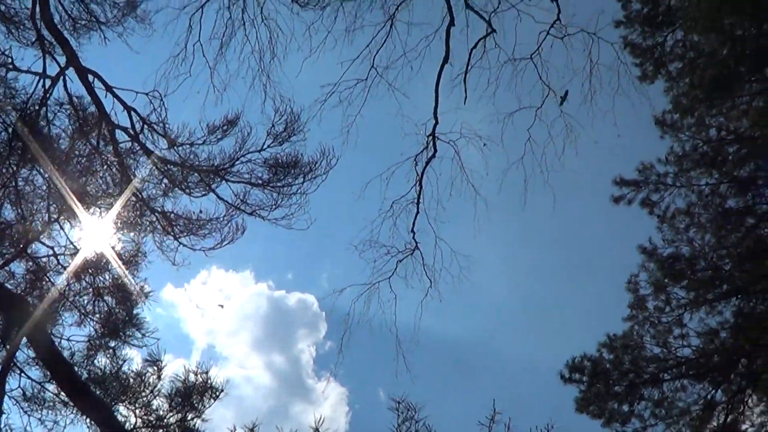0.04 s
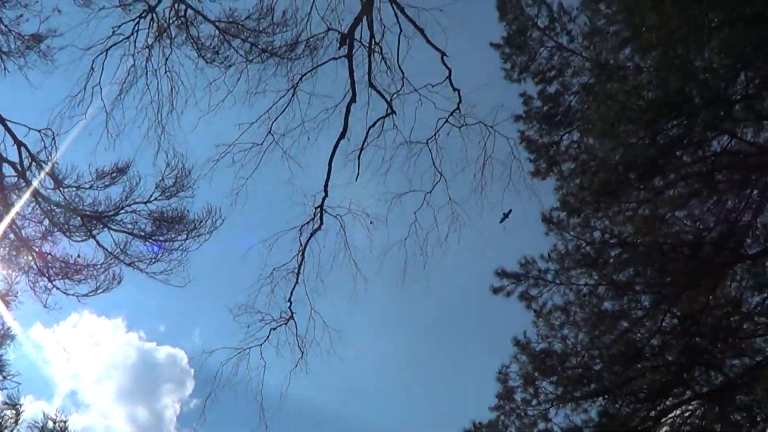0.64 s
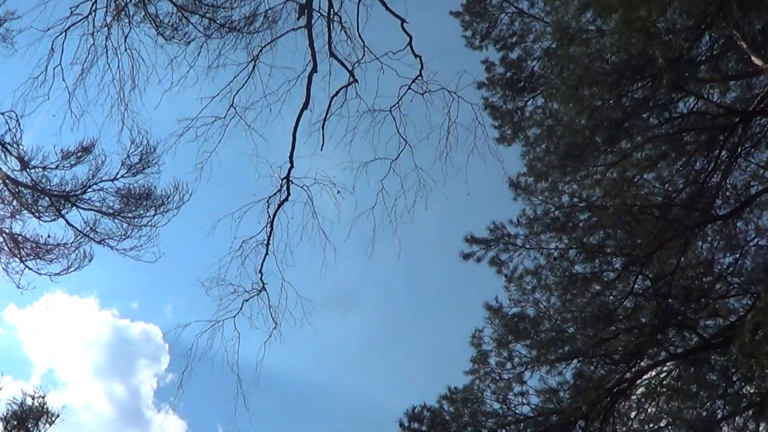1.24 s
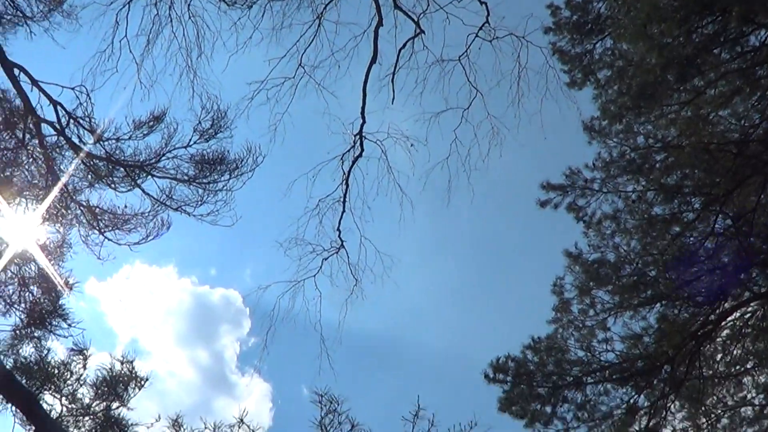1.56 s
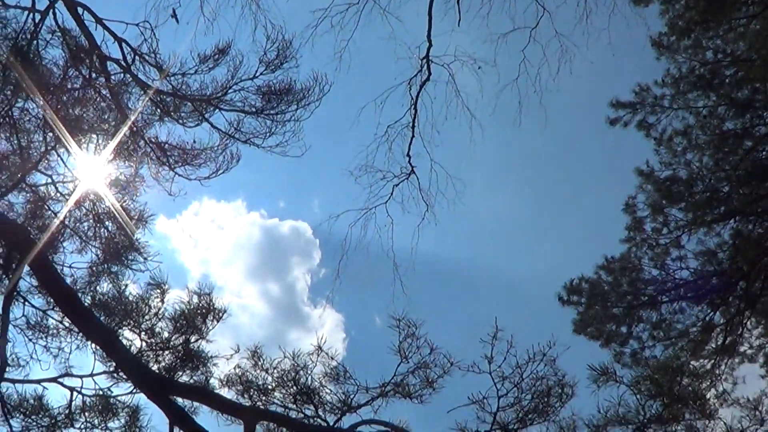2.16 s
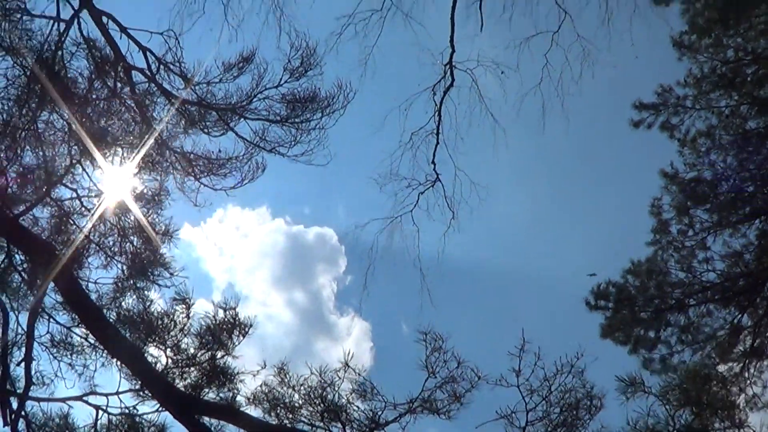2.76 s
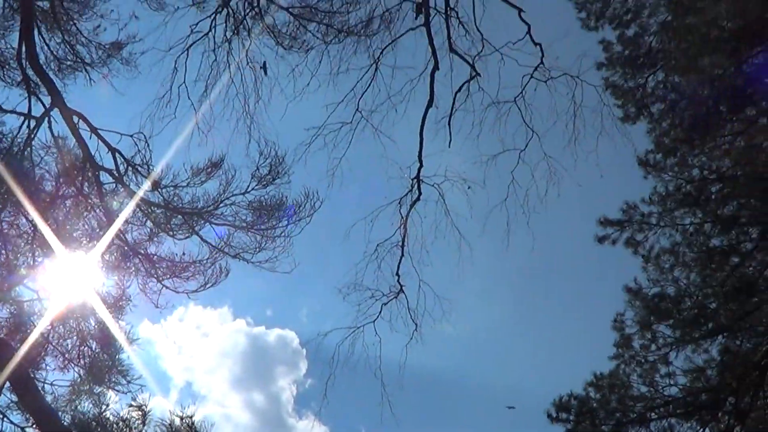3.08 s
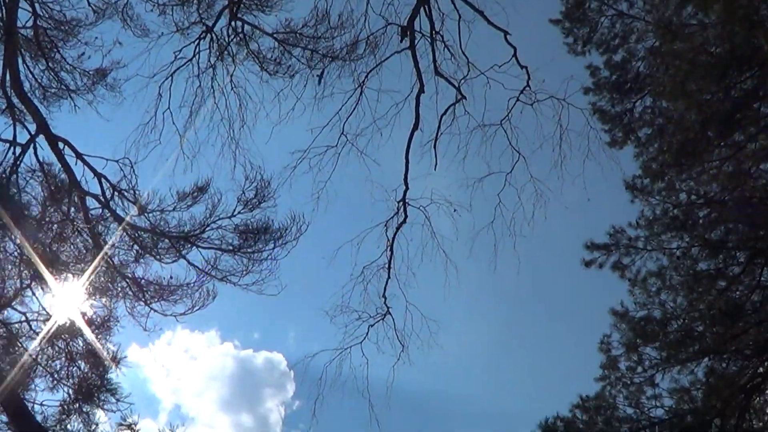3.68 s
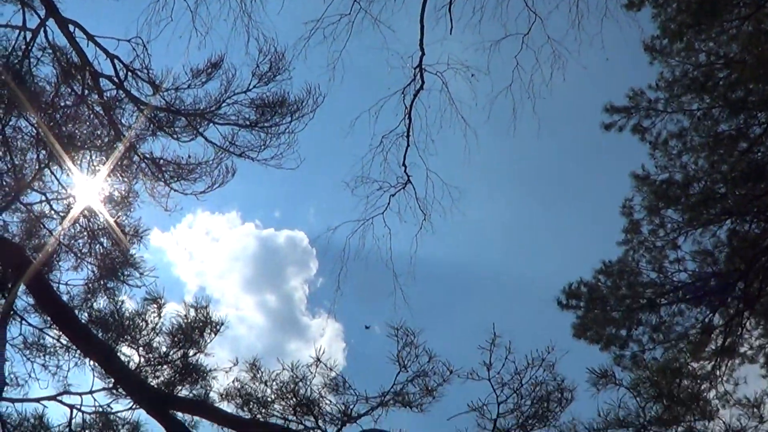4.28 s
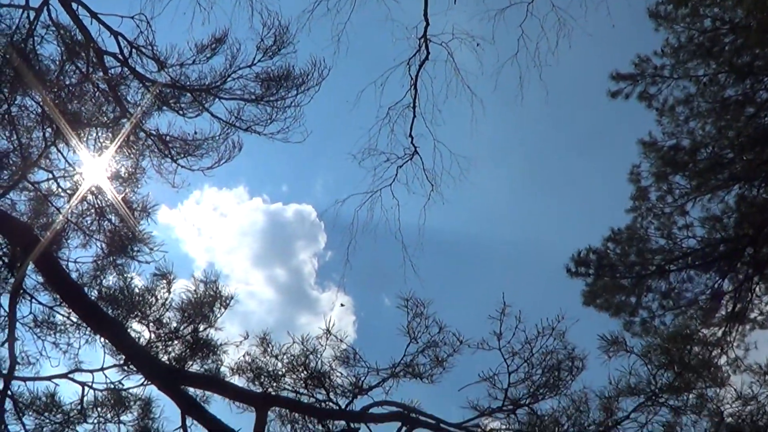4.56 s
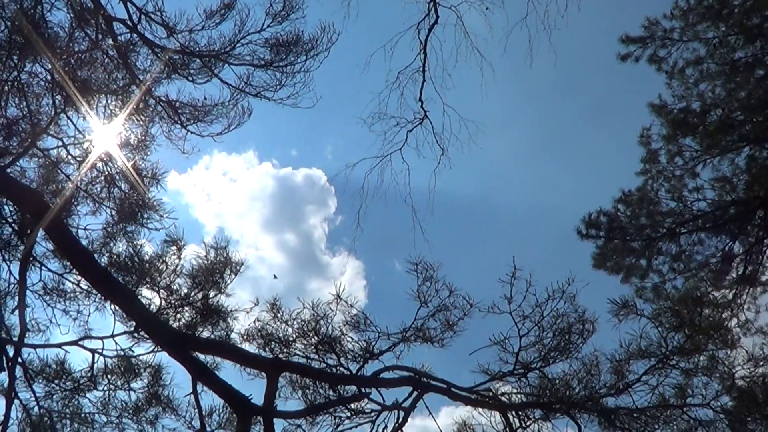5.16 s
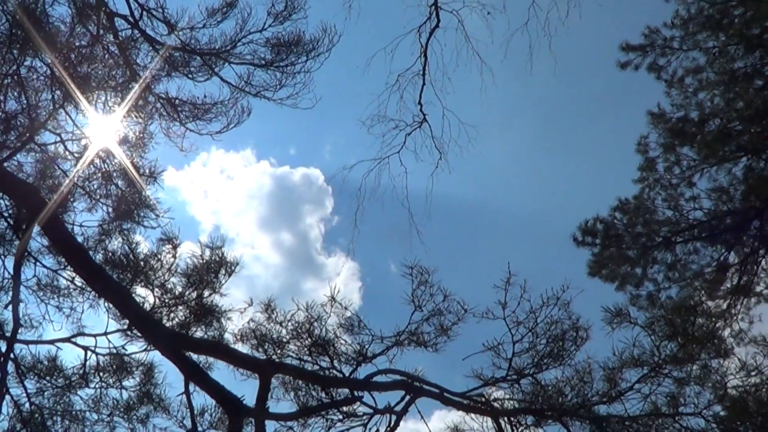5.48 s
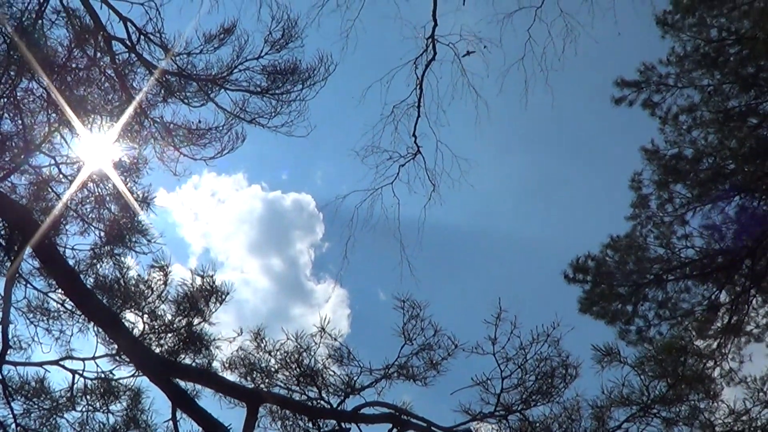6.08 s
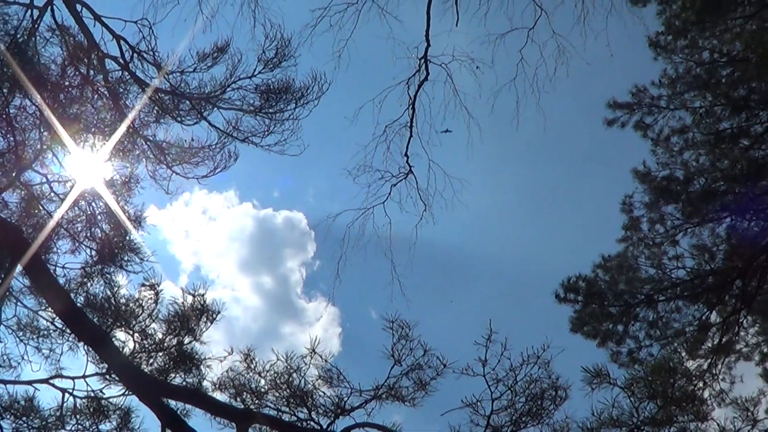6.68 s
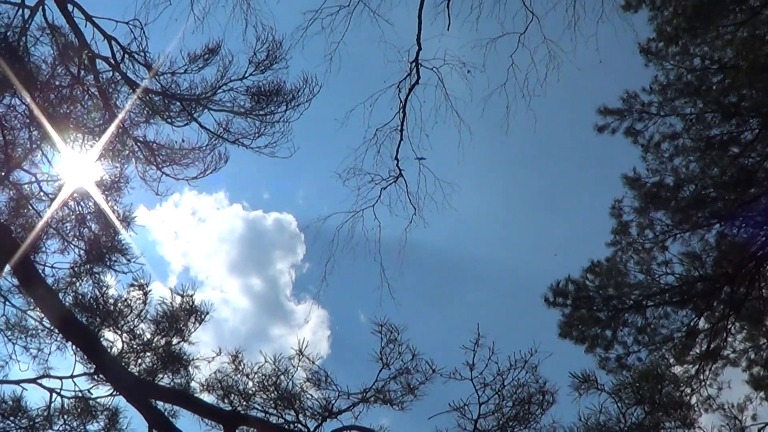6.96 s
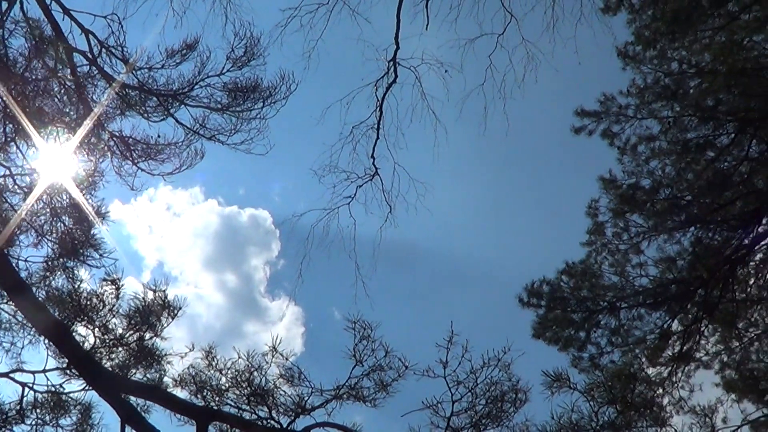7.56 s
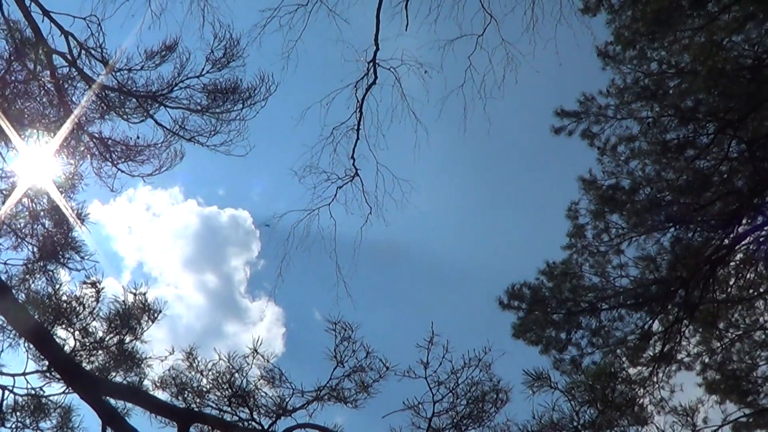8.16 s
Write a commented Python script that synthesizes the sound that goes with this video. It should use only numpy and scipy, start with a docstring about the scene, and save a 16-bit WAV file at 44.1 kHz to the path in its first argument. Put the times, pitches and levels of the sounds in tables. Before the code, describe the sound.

Ravens fly over a forest, croaking with a dry rasp: three near calls first, then a short break and a run of seven weaker ones that echo among the trees. Low gusts bump against the microphone, mostly in the first half. Thin, high chirps of small birds are scattered throughout, while twigs tick and something briefly rustles close by over a soft hiss of outdoor air.

```python
"""Wind rumbles on the microphone and at once ravens croak, ten times, flying over a pine forest.
Each croak is a slowing rattle of rasps from the syrinx, filtered by throat, beak and windpipe;
the first three are nearest, and the trees throw back a long, dull echo. Small birds chirp, twigs
tick and something rustles close by, over the hush of the forest and the camera's faint whine."""
import sys
import numpy as np
from scipy import signal
from scipy.fft import rfft, irfft, next_fast_len
from scipy.io import wavfile
from scipy.ndimage import uniform_filter1d, map_coordinates

SR = 44100
rng = np.random.default_rng(int(sys.argv[2]) if len(sys.argv) > 2 else 0)


def master(y):
    """Save y as 16-bit WAV."""
    cut = np.clip(np.atleast_2d(y).T, -1, 1)
    pcm = np.round(cut * 32767)  # scale
    wavfile.write(sys.argv[1], SR, pcm.astype(np.int16))


N = 371763
TIME = np.arange(N) / SR
# likeness of left and right in the hush and the rustle: (frequency [Hz], coherence [0-1])
AIR_COHERENCE = [(50, 1), (300, 0.054), (1000, 0.06), (4000, 0.26), (8000, 0.42), (13000, 0.98)]


def ravens(gain_db=-1.35):
    """Superposition: the croaks add up, the later and more distant ones weaker."""
    # croaks: (time [s], rasps [count], first gap [s], last gap [s], relative level [dB], onset gain [dB],
    # top pitch [Hz], throat resonance [Hz], beak gain [dB], windpipe gain [dB], windpipe tilt [dB/octave])
    croaks = [(.253, 14, 0.0098, .0225, -27, -17, 489, 1162, -10, -3.5, -7),
              (.781, 14, .012, .0195, -28, -10.5, 480.7, 1178, -6, -6, -4.5),
              (1.5255, 14, .011, 0.02, -31, -5.5, 328.8, 1048, -10, -6.5, 1),
              (3.9853, 9, .018, .0245, -31.5, -5, 398.6, 1060, -4, -6.5, -5.5),
              (4.424, 7, 0.022, .029, -35, 0, 365.7, 1054, -9, -14, -9),
              (4.827, 9, .019, 0.031, -35.5, 1, 351.2, 1020, -16, -12.5, -6.5),
              (5.450, 8, .0235, .024, -36, 2.5, 387, 1085, -9, -9.5, -11),
              (5.913, 12, 0.013, 0.029, -37, -1, 369.8, 1116, -11, -12.5, -5),
              (6.447, 9, .0195, .0325, -37.5, -5.5, 355.6, 1094, -15.5, -15, -9.5),
              (6.931, 4, 0.019, 0.029, -39, -0.5, 383, 1090, -17, -17, 1)]
    out = np.zeros(N)
    for start, *voice in croaks:
        add(out, start, croak(*voice))
    return amp(gain_db) * out


def croak(count, first_gap, last_gap, level_db, onset_db, top_hz, throat_hz, beak_db, pipe_db, tilt_db):
    """Source and filter: rasps ring the tract; pitch and formants arch as the beak opens and shuts."""
    # windpipe modes for a throat at 1170 Hz: (frequency [Hz], width [Hz], relative gain [dB])
    windpipe = [(2590, 364, -5), (3517, 350, -4.5), (4010, 284, -5), (4540, 620, -15.5), (5230, 780, -18),
                (6670, 4600, -31)]
    pipe_scale = (throat_hz / 1170) ** .3
    onset_s, bright_s, fade_s = .027, .12, .055
    gaps = np.linspace(first_gap, last_gap, count - 1)
    starts = np.append(0, np.cumsum(gaps))
    t = np.arange(int((starts[-1] + last_gap) * SR)) / SR
    shut = 1 - np.sin(np.pi * (t / t[-1]) ** 1.3)
    fading = np.clip(1 - (t[-1] - t) / fade_s, 0, 1) ** 2
    drive = syrinx(t, starts, np.append(gaps, last_gap), pitch=top_hz * (1 - .15 * shut ** 2))
    throat = (throat_hz * (1 - .039 * (shut - .3)), top_hz, 0)  # as wide as the top pitch
    beak = (1.61 * throat_hz * (1 - .058 * (shut - .2)), 380, beak_db - 10 * shut)
    # the first rasps snap hardest; the last are dull
    bright_db = pipe_db + 4 * np.exp(-t / bright_s) - 4 * fading
    pipe = [(hz * pipe_scale, width, db + bright_db + tilt_db * np.log2(hz / 3000))
            for hz, width, db in windpipe]
    chest = amp(-23) * resonate(drive, hz=400, width=560)
    voice = vocal_tract(drive, [throat, beak, *pipe]) + chest
    return unit(voice) * amp(level_db + onset_db * np.exp(-t / onset_s) - 12 * fading)


def syrinx(t, starts, gaps, pitch, opening_s=.11, jitter=.05, shimmer_db=2, sag_db=5.5, puff_s=.0014):
    """Pulse excitation: the syrinx opens once a rasp and claps a few times, ever faster."""
    claps, gate = np.zeros((2, len(t)))
    for start, gap in zip(starts, gaps):
        length = gap * np.interp(start, [0, opening_s], [.14, .92])  # rasps lengthen and nearly merge
        timing, size = rng.standard_normal((2, 20))
        hz = np.interp(start, t, pitch)
        progress = np.minimum(np.arange(len(timing)) / (hz * gap), 1)
        periods = (1 + jitter * timing - .1 * (progress - .5)) / hz
        offsets = np.cumsum(periods) - periods[0]
        for offset, db in zip(offsets[offsets < length], size * shimmer_db):
            # the claps are strongest early in each rasp
            add(claps, start + offset, amp([db - sag_db * (2 * offset / gap - .55) ** 2]))
        gate[(t >= start) & (t < start + length)] = 1
    # each clap lets a puff of turbulent air through
    airflow = signal.lfilter([1], [1, -np.exp(-1 / (puff_s * SR))], claps) + .066 * gate
    puffs = airflow * rng.standard_normal(len(t))
    return unit(claps) + .4 * unit(puffs)


def vocal_tract(drive, formants, flutter_db=1.5, wobble=.025, flutter_s=.011):
    """Parallel resonators of alternating sign quiver: (frequency [Hz], width [Hz], gain [dB])."""
    voice = np.zeros(len(drive))
    for k, (hz, width, db) in enumerate(formants):
        ring = resonate(drive, hz * (1 + wobble * wander(len(drive), flutter_s)), width)
        voice += (-1) ** k * amp(db + flutter_db * wander(len(drive), flutter_s)) * ring
    low_cut_hz = .59 * np.mean(formants[0][0])
    return signal.sosfilt(signal.butter(4, low_cut_hz, "highpass", fs=SR, output="sos"), voice)


def small_birds(waver=.0062):
    """Frequency modulation: each thin whistle is one tilted arch of pitch."""
    # chirps: (time [s], length [s], middle pitch [Hz], rise [share of that pitch], level [dB])
    chirps = [(.68, .082, 7430, 0.052, -53), (1.127, 0.071, 4260, .055, -48),
              (1.324, 0.053, 4230, .03, -50), (3.313, 0.08, 7880, .03, -55),
              (3.502, .071, 4340, .03, -53.5), (3.8, 0.073, 4300, 0.0015, -50),
              (4.28, .08, 4720, -.06, -61), (4.936, .21, 5050, -.16, -58.5), (5.092, 0.098, 7100, .02, -63),
              (5.29, 0.13, 4350, 0.006, -55.5), (5.52, 0.16, 4510, .045, -56),
              (7.405, .085, 7850, .08, -60), (7.611, 0.061, 4380, .06, -52), (7.83, 0.1, 4220, 0, -59)]
    out = np.zeros(N)
    for start, length, middle_hz, rise, db in chirps:
        position = np.linspace(-.5, .5, int(length * SR))
        arch = .064 * (middle_hz / 7630) ** 3.43  # lower whistles are flatter
        contour = 1 + rise * position - arch * (2 * position) ** 2
        hz = middle_hz * (contour + waver * wander(len(position), .0022))
        add(out, start, amp(db) * np.cos(np.pi * position) * np.sin(2 * np.pi * np.cumsum(hz) / SR))
    return out


def forest_echo(calls, near_db=-10, far_db=-16, near_s=.011, build_s=.0087, sway_s=.000836):
    """Scattering and reverberation: near branches answer at once, distant trunks with a long tail."""
    # reverberation of the forest: (frequency [Hz], time to fall 60 dB [s])
    decay_times = [(300, 0.23), (1100, 1.36), (1700, 0.88), (2600, 0.79), (4500, 0.59), (9000, 0.093)]
    t = np.arange(2 * SR) / SR
    taps = rng.standard_normal((2, len(t))) * (rng.random((2, len(t))) < 2500 / SR)
    taps = taps + .79 * taps[::-1]  # each reflection reaches both sides
    near = taps[:, ::-1] * np.exp(-t / near_s) * (t > .003)
    hz, frame_s, spectra = signal.stft(taps, SR, nperseg=256)
    decay = amp(-60 * frame_s / at_hz(decay_times, hz)[:, None])
    far = signal.istft(spectra * decay, SR, nperseg=256)[1][:, :len(t)]
    far *= 1 - np.exp(-t / build_s)
    # the birds are in flight: a wandering delay gives the tail slight Doppler shifts
    shifted = map_coordinates(calls, [np.arange(N) + sway_s * SR * wander(N, .03)], order=3)
    early = signal.fftconvolve(calls[None], amp(near_db) * near / np.linalg.norm(near[0]), axes=1)
    late = signal.fftconvolve(shifted[None], amp(far_db) * far / np.linalg.norm(far[0]), axes=1)
    return (early + late)[:, :N]


def twigs(decay_s=.0042):
    """Damped resonance: a dying puff of noise excites a dry snap and a woody knock."""
    # ticks: (time [s], peak level [dB], snap centre [Hz], knock against snap [dB])
    ticks = [(0.119, -36, 4550, -2), (1.688, -35, 8000, -20), (2.959, -34.5, 880, -14),
             (3.036, -32.5, 7000, -5.5), (3.051, -32, 1160, -14), (3.288, -31.5, 1340, -14),
             (3.767, -32.5, 850, -20), (7.002, -30.5, 7960, 5), (7.297, -39, 4700, -26),
             (7.647, -33.5, 2000, 1)]
    out, t = np.zeros(N), np.arange(SR // 20) / SR
    for start, db, hz, knock_db in ticks:
        puff = rng.standard_normal(len(t)) * np.exp(-t / decay_s)
        snap = unit(resonate(puff, hz, width=1.7 * hz))
        knock = amp(knock_db) * unit(resonate(puff, hz=2300, width=1300))
        tick = snap + knock
        add(out, start, amp(db) * tick / abs(tick).max())
    return out


def microphone_ports(x):
    """Phase and level cues: overhead sound leads at the left port; the balance shifts as birds pass."""
    # lead of the left port: (frequency [Hz], phase [rad])
    left_lead = [(100, .05), (400, 0.7), (850, 0.64), (1500, 0.69), (3700, 0.54), (6500, 0.89), (9500, .02)]
    # stereo balance: (time [s], right minus left [dB])
    balance = [(.6, 0.5), (1.6, 1.5), (4.2, 0.5), (6, -0.7)]
    size = next_fast_len(N)
    phase = at_hz(left_lead, np.fft.rfftfreq(size, 1 / SR))
    right = irfft(rfft(x[1], size) * np.exp(-1j * phase), size)[:N]
    right_db = at_time(balance)
    return np.array([x[0] * amp(-right_db / 2), right * amp(right_db / 2)])


def wind(lumps_db=3, knee_db=-30):
    """Turbulence at the microphone rumbles; strong gusts and sudden buffets reach higher in pitch."""
    # gusts: (start [s], length [s], relative level [dB], swell from start to end [dB])
    gusts = [(0, .83, -35, 2), (.93, 0.083, -34, 8), (1.12, 0.13, -32, 11), (1.431, 0.26, -37, 5),
             (1.812, 0.06, -36, 11), (2.046, 0.19, -37, 6.5), (2.398, .05, -47, -1),
             (3.073, 0.98, -33.5, 5), (4.305, 0.034, -42.5, 3), (4.555, 0.26, -49, -4.5),
             (5.117, 0.064, -49.5, 4), (6.298, 0.018, -51, 2), (6.695, 0.57, -57, -3),
             (7.321, 0.2, -41.5, 11), (7.813, 0.57, -53, -3.5)]
    # sharp buffets: (peak time [s], level [dB], half-width at 1/e [s])
    buffets = [(0.119, -27.5, 0.0057), (0.264, -27, 0.015), (0.491, -25.5, 0.016), (0.562, -26, 0.02),
               (1.227, -31, 0.012), (1.297, -25.5, 0.0048), (1.897, -15.5, 0.015), (2.18, -22, 0.023),
               (3.437, -30, 0.011), (3.503, -25.5, 0.0094), (3.676, -22.5, 0.013), (3.773, -23, 0.015),
               (3.881, -24.5, 0.018), (3.937, -18.5, 0.011), (3.972, -22.5, 0.021), (4.649, -34.5, 0.006),
               (7.528, -38, 0.0088), (8.277, -38.5, 0.0073)]
    # spectra of the deep and of the brighter eddies: (frequency [Hz], relative level [dB])
    rumble_spectrum = [(12, -32), (25, -1), (55, 6.5), (110, 4.5), (170, -1), (230, -10.5), (320, -15.5),
                       (500, -29), (900, -60), (1600, -100)]
    buffet_spectrum = [(25, -61), (70, -3), (140, 3.5), (250, -3.5), (400, -13.5), (700, -25.5),
                       (1500, -43), (3000, -64.5)]
    level_db = 20 * np.log10(sum(gust(*row) for row in gusts)) + lumps_db * wander(N, .016)
    rumble = amp(level_db - .5) * eddies(rumble_spectrum, steady_s=.36)
    edge = amp(level_db - 12 + np.minimum(.5 * (level_db - knee_db), 0))
    sudden = sum(amp(db) * np.exp(-((TIME - peak_s) / half_s) ** 2) for peak_s, db, half_s in buffets)
    return rumble + np.hypot(edge, sudden) * eddies(buffet_spectrum, steady_s=.015)


def gust(start, length, db, swell_db, attack_s=.02, release_s=.038):
    """Exponential envelope: a gust arrives quickly, swells or ebbs steadily and drops away."""
    t = TIME - start
    outside = np.maximum(-t, 0) / attack_s + np.maximum(t - length, 0) / release_s
    return amp(db + swell_db * (np.clip(t / length, 0, 1) - .5)) * np.exp(-np.minimum(outside, 20))


def eddies(spectrum, steady_s):
    """Turbulent pressure: low noise whose power is even over spans longer than steady_s."""
    pressure = noise(spectrum, coherence=[(30, .7), (70, .92), (130, .49), (260, .016)])
    return pressure / np.sqrt(smooth((pressure ** 2).mean(0), steady_s) + .011)


def rustle(grain_db=2, grain_s=.0047):
    """Random amplitude modulation turns noise into soft, grainy scuffing close by."""
    # envelope of the scuffing: (time [s], level [dB])
    levels = [(2.6, -81), (2.8, -56.5), (2.95, -53), (3.08, -58), (3.3, -65), (3.9, -59), (4.1, -80)]
    # its spectrum: (frequency [Hz], relative level [dB])
    spectrum = [(100, -7), (300, 3), (900, -1), (2500, -1), (4500, -2), (7500, -2), (11000, -10),
                (16000, -21)]
    grains = np.minimum(wander(N, grain_s), 1.2)
    return amp(at_time(levels)) * unit(amp(grain_db * grains)) * noise(spectrum, AIR_COHERENCE)


def hush():
    """Broadband noise floor: forest air and microphone hiss drift slowly in level."""
    # envelope of the hush: (time [s], level [dB])
    levels = [(0, -47.5), (2.6, -50.5), (4.4, -49.5), (8.4, -53)]
    # its spectrum: (frequency [Hz], relative level [dB])
    spectrum = [(15, -20), (30, 4), (167, -2), (420, -0.5), (720, -2), (1110, -3), (1730, -8.5),
                (2920, -8.5), (4200, -11.5), (7000, -16), (11300, -18.5), (16000, -19.5)]
    return amp(at_time(levels)) * noise(spectrum, AIR_COHERENCE)


def camera_whine(db=-58, line_hz=15625, field_hz=50, blank_share=.1, slip_turns=.12):
    """Periodic gating: the line-scan tone drops out briefly and restarts once a field."""
    field = TIME * field_hz % 1
    gate = smooth(1. * (field > blank_share), .002)
    return amp(db) * np.sin(2 * np.pi * (line_hz * TIME + slip_turns * field)) * gate


def resonate(x, hz, width):
    """Resonance: a steep band-pass whose centre follows hz."""
    carrier = np.exp(2j * np.pi * np.cumsum(hz * np.ones(len(x))) / SR)
    pole = np.exp(-np.pi * width / SR)
    return 2 * (carrier * signal.lfilter([(1 - pole) ** 2], [1, -2 * pole, pole ** 2], x / carrier)).real


def noise(spectrum, coherence):
    """Spectral shaping: stereo noise of rms 1 with a given colour and left-right coherence."""
    size = next_fast_len(N)
    hz = np.fft.rfftfreq(size, 1 / SR)
    mid, side = rfft(rng.standard_normal((2, size)))
    same = np.clip(at_hz(coherence, hz), 0, 1)
    mid, side = mid * np.sqrt(1 + same), side * np.sqrt(1 - same)
    return unit(irfft(np.array([mid + side, mid - side]) * amp(at_hz(spectrum, hz)), size)[:, :N])


def wander(count, seconds):
    """Low-passed noise of rms 1 that changes over the given time."""
    spare = int(2 * seconds * SR) + 1
    return unit(smooth(rng.standard_normal(count + 2 * spare), seconds)[spare:-spare])


def smooth(x, seconds):
    """Triangular running mean."""
    size = max(int(seconds * SR), 1)
    return uniform_filter1d(uniform_filter1d(x, size), size)


def amp(db):
    """Decibels to amplitude ratio."""
    return 10 ** (np.asarray(db) / 20)


def unit(x):
    """Normalises to rms 1."""
    return x / np.sqrt(np.mean(x ** 2) + 1e-20)


def at_hz(points, hz):
    """Interpolates a table on a log-frequency axis."""
    frequencies, values = np.transpose(points)
    return np.interp(np.log(hz + 1), np.log(frequencies + 1), values)


def at_time(points):
    """Interpolates a table at every sample time."""
    return np.interp(TIME, *np.transpose(points))


def add(mix, start_s, sound):
    """Superposes a sound on the mix."""
    part = mix[max(round(start_s * SR), 0):][:len(sound)]
    part += sound[:len(part)]


def scene():
    """Superposition of birds, their echo and twigs with the hush, the rustle and the wind."""
    calls = ravens() + small_birds()
    air = hush()
    echo = forest_echo(calls)
    return microphone_ports(calls + twigs() + echo) + air + rustle() + wind()


def record(dry, cutoff_hz=15900):
    """Band limiting: the camera adds its whine, then cuts the highest treble."""
    low_pass = signal.firwin(1023, cutoff_hz, window=("kaiser", 9), fs=SR)
    return signal.oaconvolve(dry + camera_whine(), low_pass[None], "same", axes=1)


dry = scene()
out = record(dry)
master(out)
```